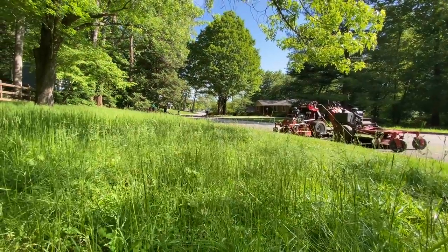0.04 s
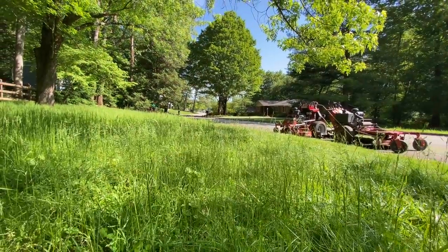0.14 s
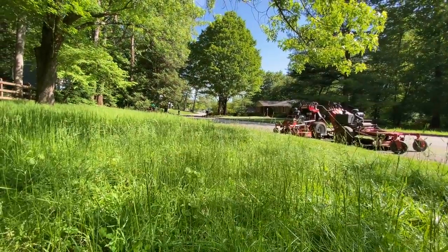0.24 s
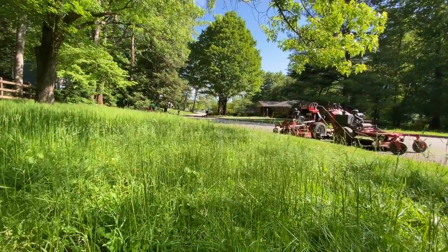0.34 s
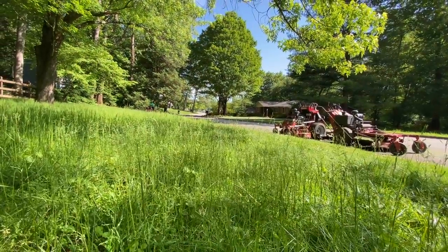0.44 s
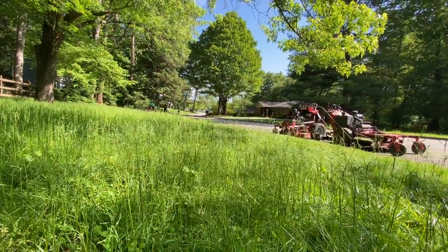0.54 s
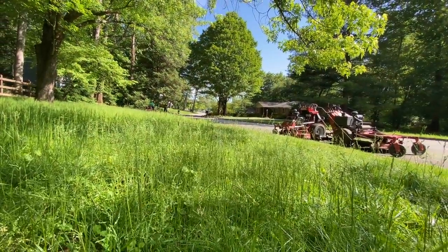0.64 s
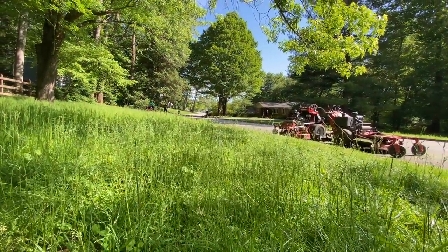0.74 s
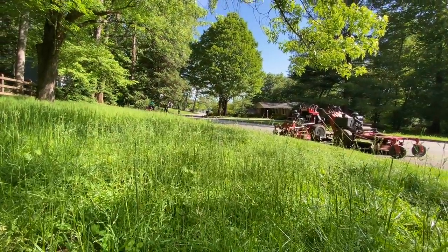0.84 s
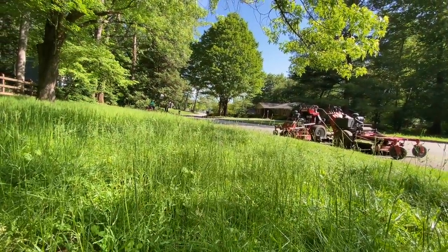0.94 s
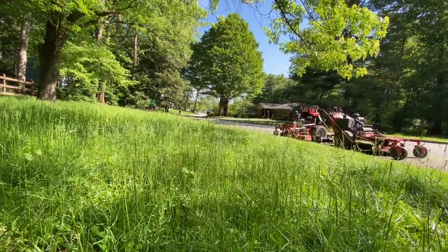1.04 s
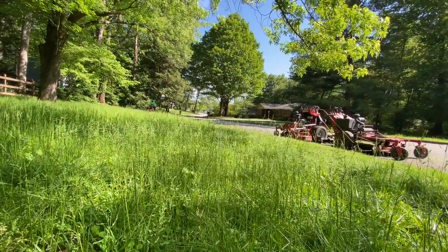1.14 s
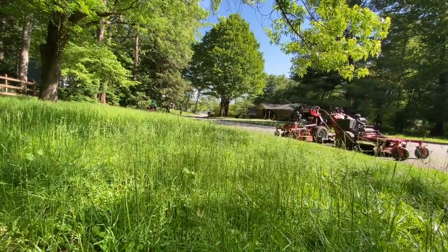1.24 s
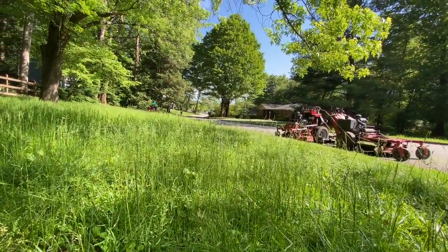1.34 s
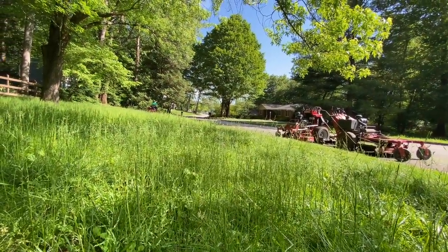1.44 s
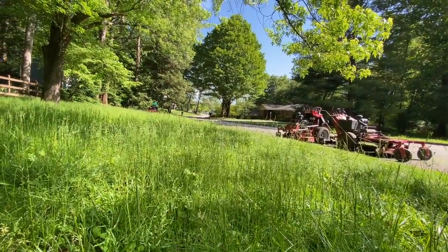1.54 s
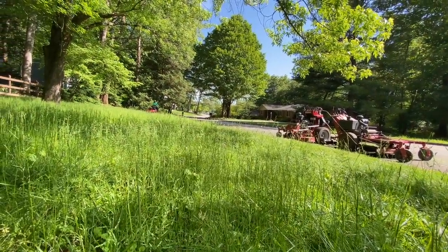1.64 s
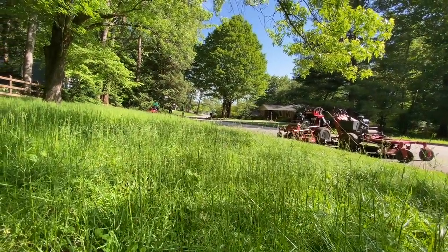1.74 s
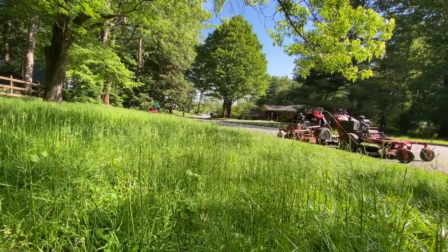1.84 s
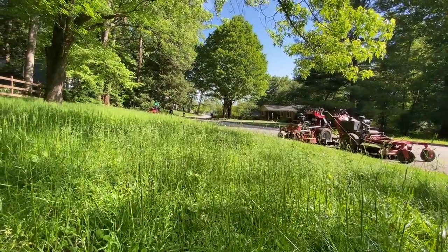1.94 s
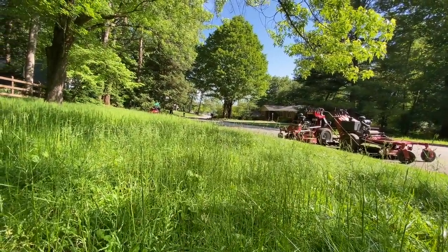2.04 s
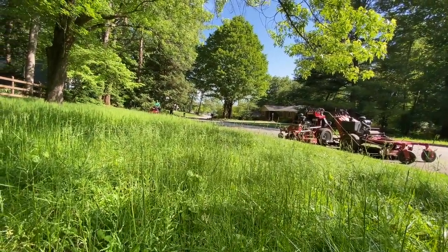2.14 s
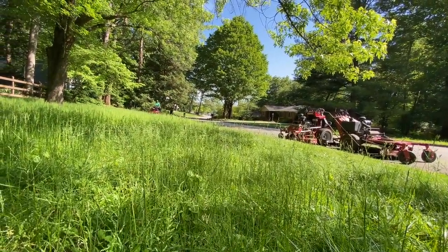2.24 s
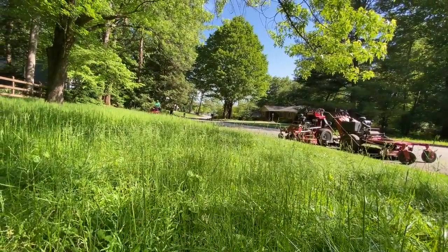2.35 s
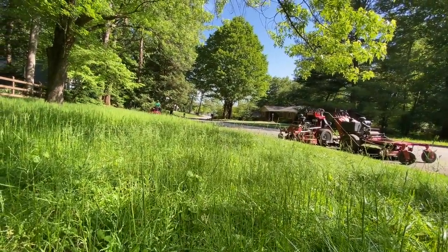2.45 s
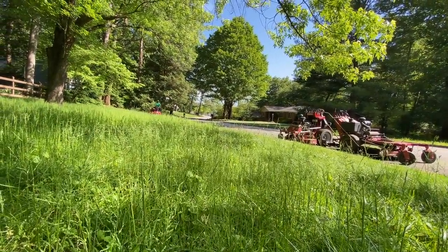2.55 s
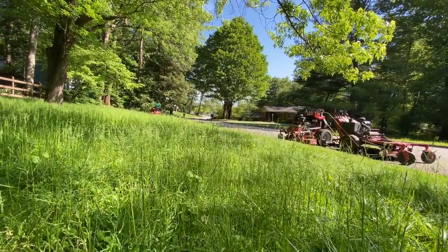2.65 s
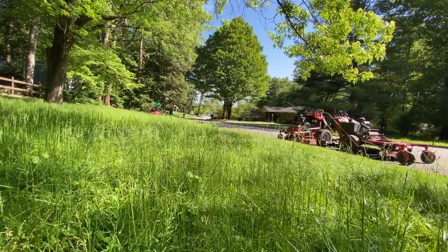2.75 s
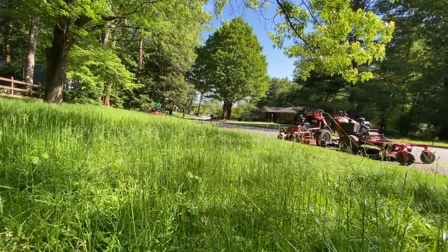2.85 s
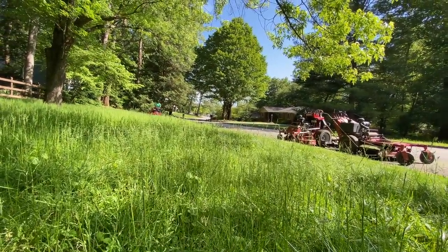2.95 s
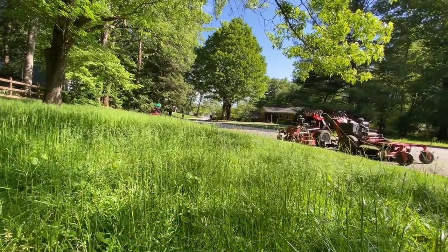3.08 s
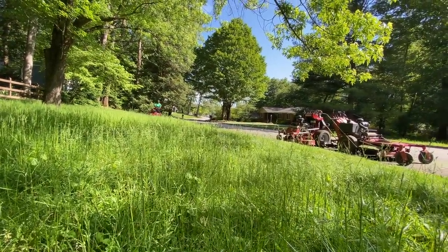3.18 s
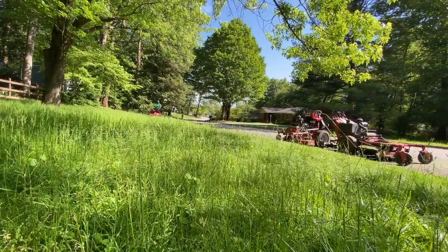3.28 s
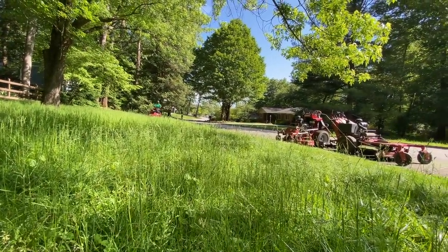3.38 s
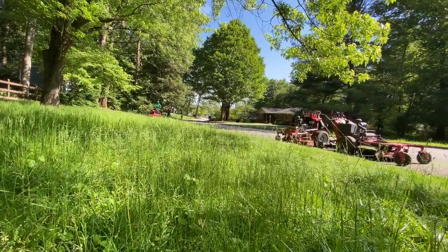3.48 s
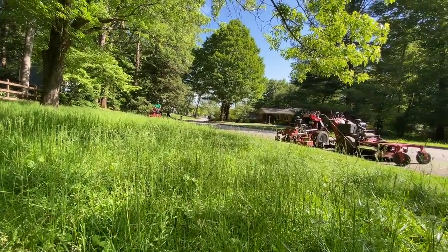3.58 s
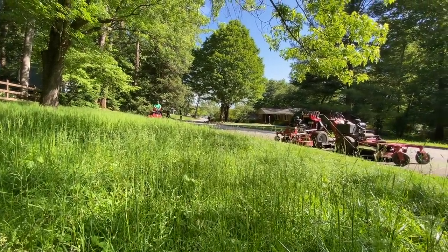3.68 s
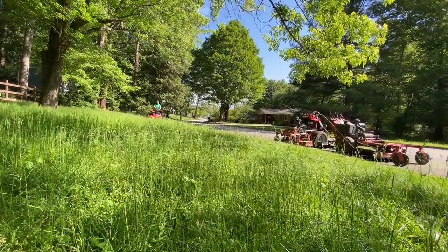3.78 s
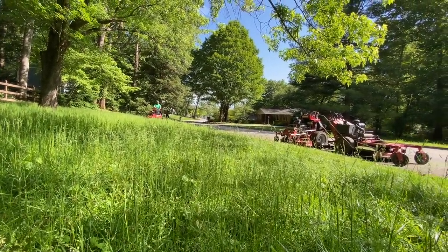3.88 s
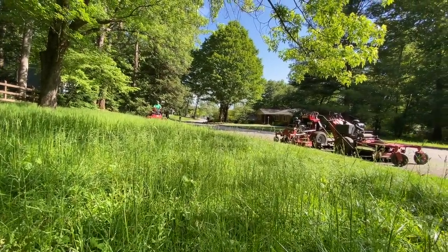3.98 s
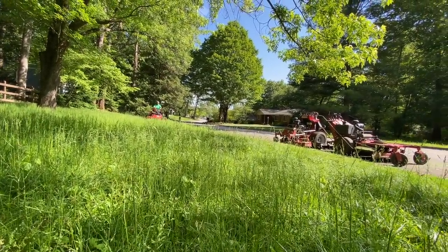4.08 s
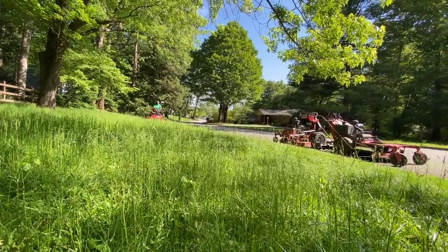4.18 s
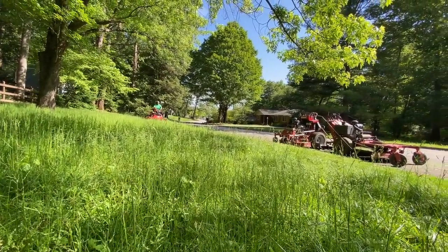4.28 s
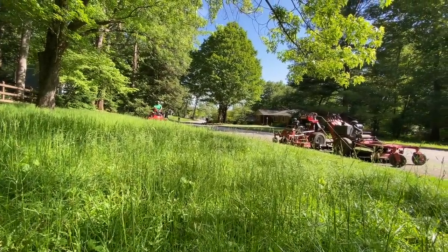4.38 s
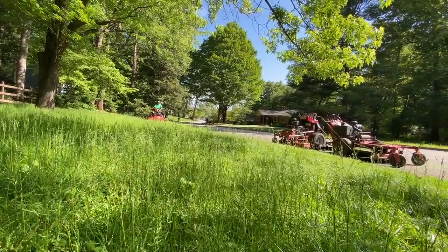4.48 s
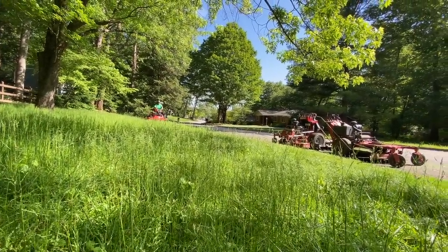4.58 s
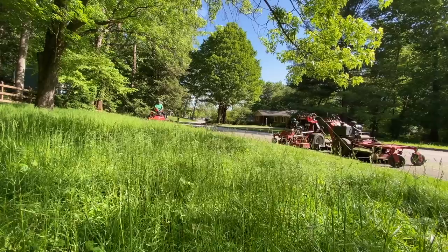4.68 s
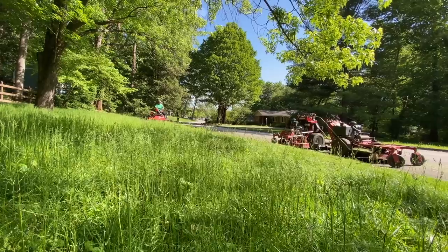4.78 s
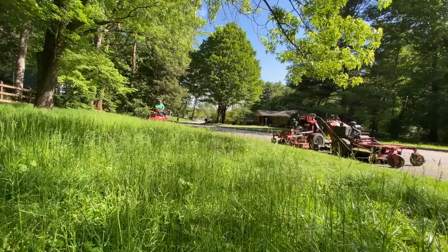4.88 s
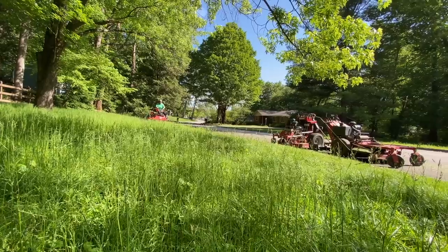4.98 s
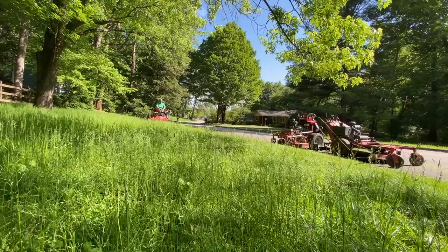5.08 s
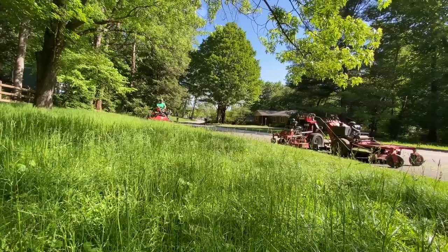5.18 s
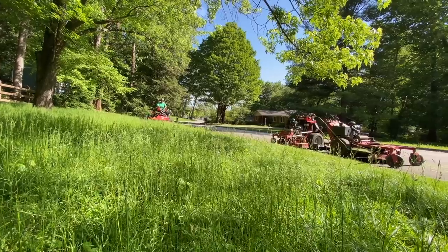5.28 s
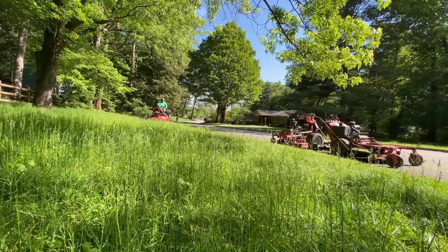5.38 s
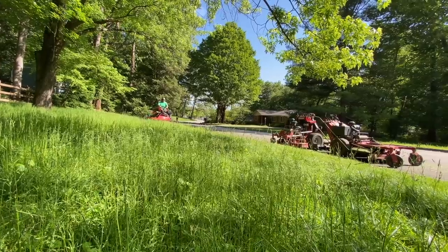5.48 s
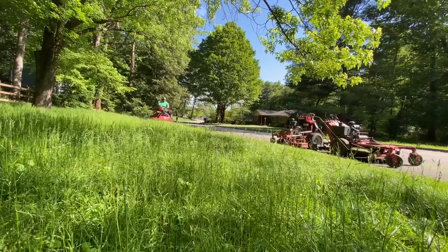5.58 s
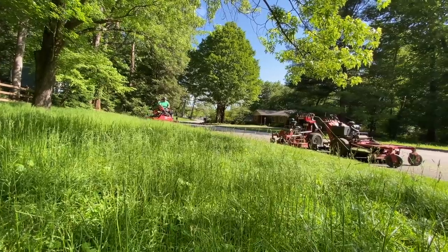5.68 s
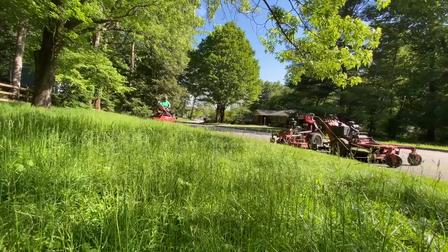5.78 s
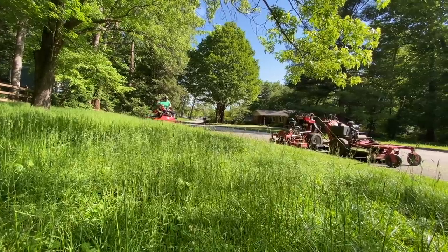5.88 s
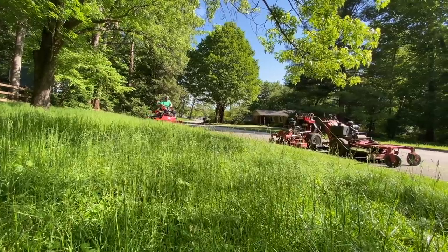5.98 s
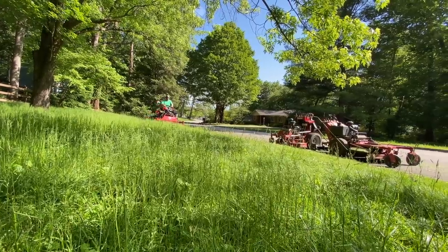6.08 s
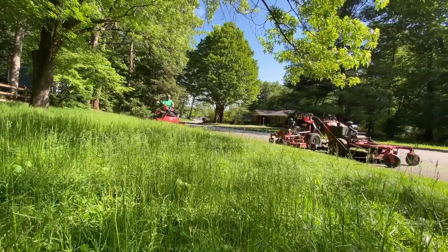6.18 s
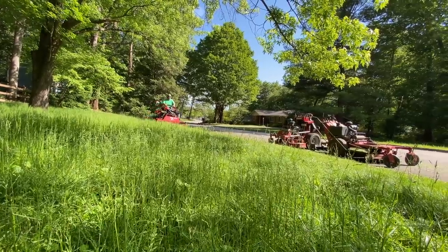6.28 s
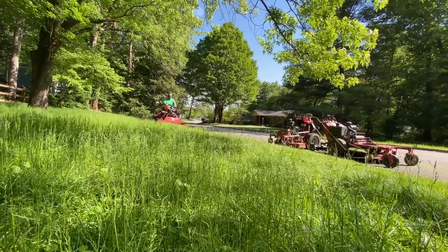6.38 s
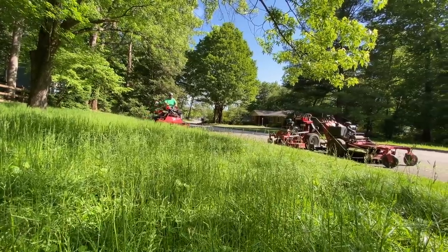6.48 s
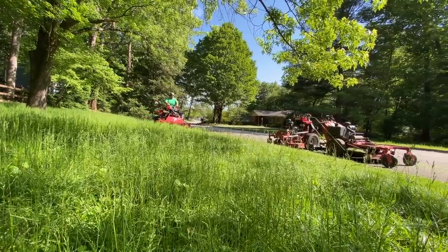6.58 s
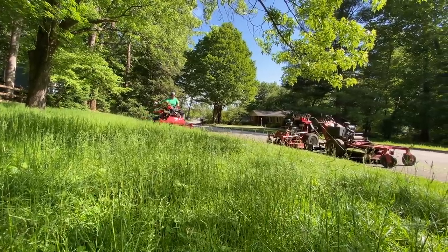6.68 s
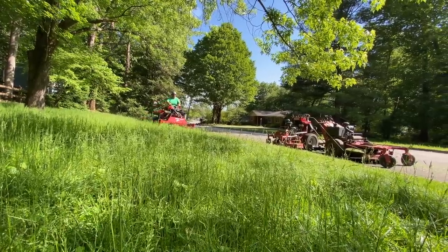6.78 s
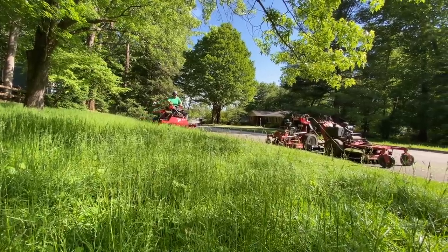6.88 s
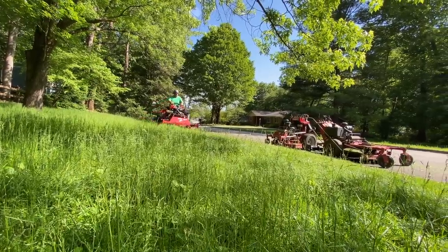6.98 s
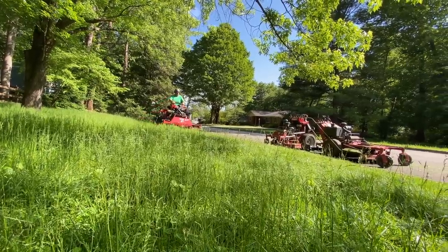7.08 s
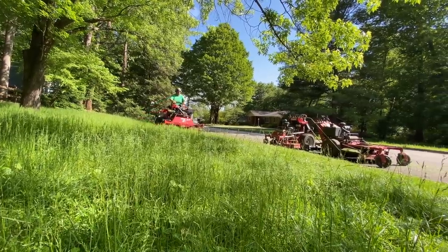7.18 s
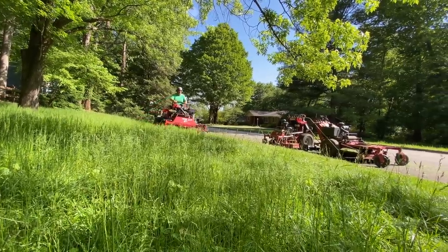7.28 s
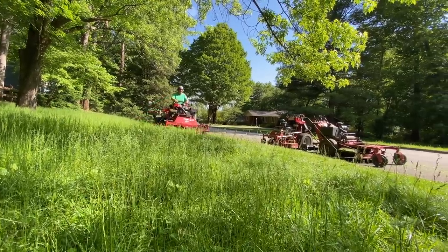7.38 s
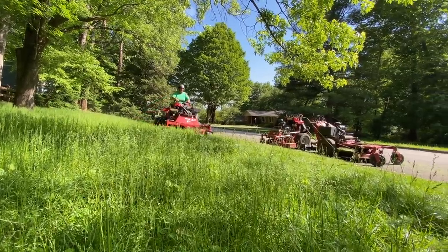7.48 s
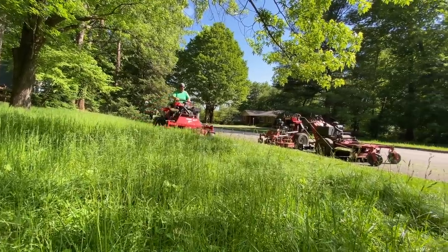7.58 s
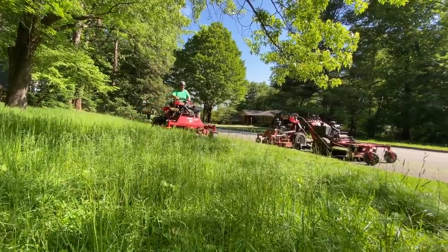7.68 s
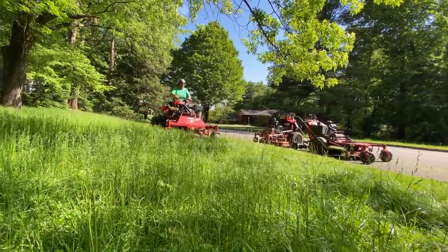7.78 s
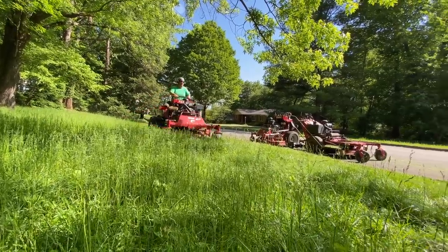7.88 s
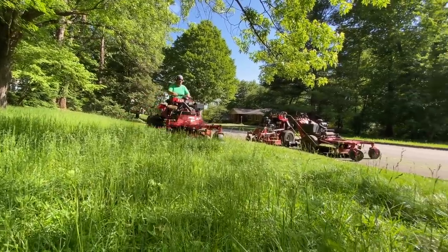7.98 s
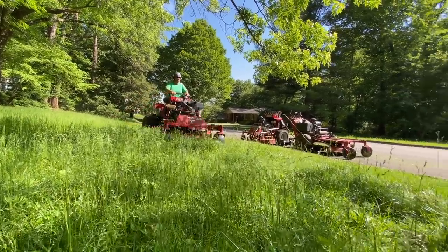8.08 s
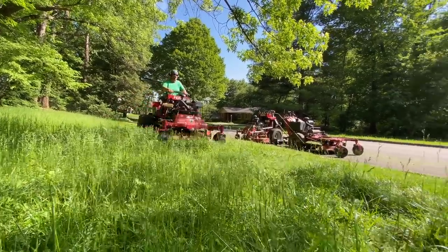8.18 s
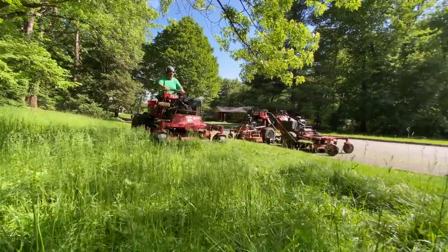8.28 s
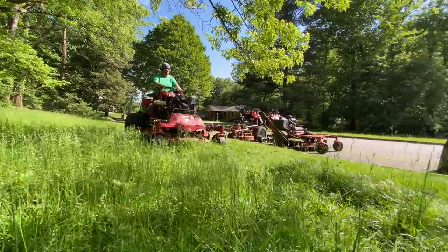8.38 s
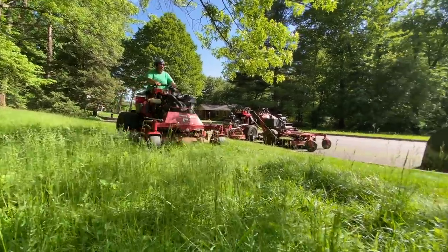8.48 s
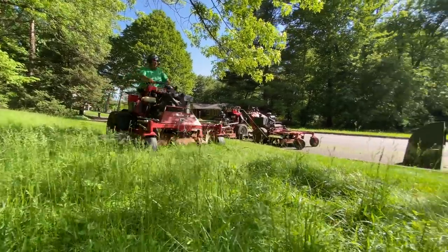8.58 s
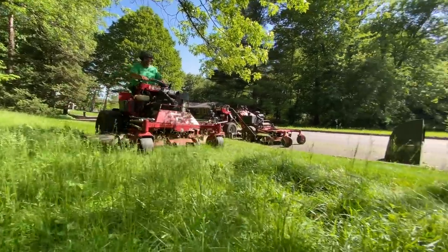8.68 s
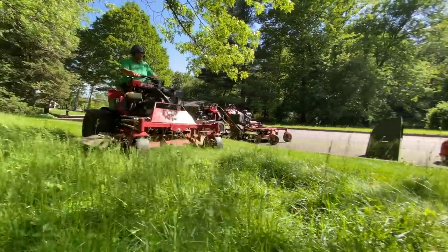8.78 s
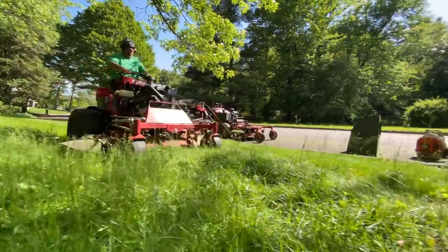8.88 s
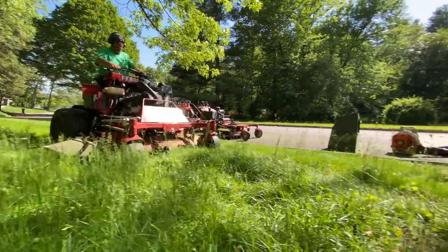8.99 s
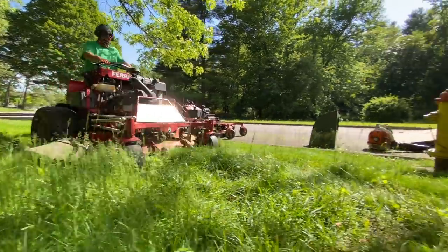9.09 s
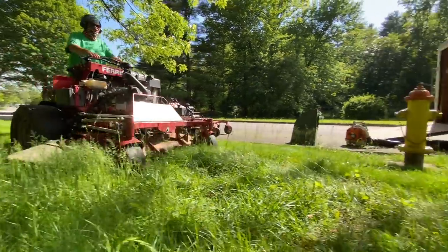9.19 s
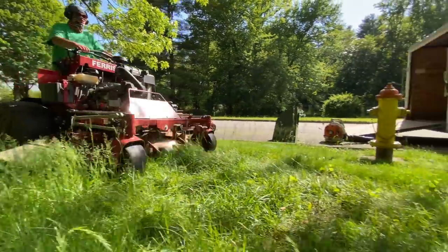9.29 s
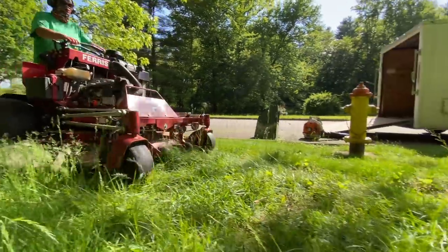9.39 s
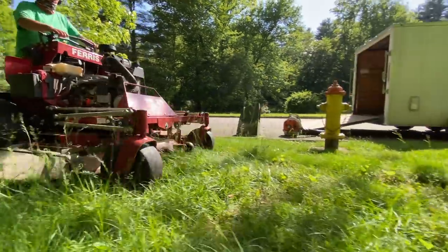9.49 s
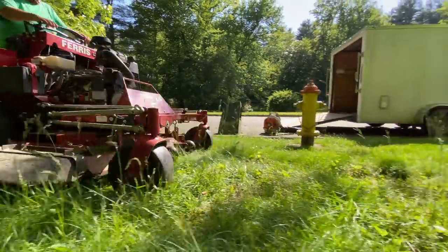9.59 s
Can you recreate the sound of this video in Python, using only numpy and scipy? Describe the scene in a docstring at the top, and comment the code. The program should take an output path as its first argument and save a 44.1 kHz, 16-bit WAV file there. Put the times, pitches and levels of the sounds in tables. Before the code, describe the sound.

A ride-on mower drones steadily across a lawn, growing from a distant hum to a close throbbing roar with swishing grass and snapping stalks.

```python
"""Ride-on mower approaching through grass

A two-cylinder mower drives across a lawn toward a pair of microphones low in the grass, ending on their left.
Wavering sines make the throb of the engine, the hum of the blades, a gear whine and a belt hum.
Shaped noise makes the deck roar, the swish of cut grass and the engine hiss, puffed twice per firing cycle.
Short noise bursts are stalks snapping. Arrival, likeness and balance at the two microphones place it in stereo."""
import sys
import numpy as np
from scipy import signal
from scipy.io import wavfile
from scipy.ndimage import uniform_filter1d, map_coordinates

SR = 44100
rng = np.random.default_rng(int(sys.argv[2]) if len(sys.argv) > 2 else 0)


def inscribe(sig):
    """Save sig as 16-bit PCM at rate SR to the path in sys.argv[1].

    A 1-D sig is mono; a 2-D sig holds one channel per row.
    Samples are clipped to [-1, 1] before scaling.
    """
    pcm = np.round(np.clip(np.atleast_2d(sig).T, -1, 1) * 32767)
    wavfile.write(sys.argv[1], SR, pcm.astype(np.int16))


N = 425124
SIZE, HOP = 2048, 512  # noise frame and step, samples

# the drive across the lawn: time_s, distance_m, bearing (0 ahead left, 1 ahead, 2 beside)
PATH = [(0, 47, 0), (3, 32, 0.09), (5, 21, 0.24), (6.5, 17, 0.49), (7.6, 14, 0.94), (8.4, 8.1, 0.9),
        (8.75, 2.5, 1.33), (9.1, 2.3, 1.71), (9.64, 2.6, 2)]
# engine speed, hunting under the load of the grass: time_s, firing_cycles_hz
SPEED = [(0, 27.45), (.75, 27.31), (1.25, 27.4), (1.75, 27.29), (2.3, 27.42), (2.7, 27.6), (3.3, 27.49),
         (3.8, 27.47), (4.25, 27.54), (4.75, 27.47), (5.3, 27.58), (5.75, 27.56), (6.25, 27.42),
         (6.75, 27.44), (7.25, 27.5), (7.75, 27.63), (8.25, 27.48), (8.7, 27.7), (9.64, 27.73)]
# loudness along the drive: time_s, deck_roar_db, engine_hiss_db
LEVELS = [(0, -40.5, -48), (.8, -39.5, -46), (1.9, -37.5, -44.5), (3, -36.5, -44), (4.1, -35, -42.5),
          (5, -33.5, -41.5), (5.5, -32.5, -40), (6.5, -30.5, -37.5), (7.2, -29.5, -35), (8.2, -27.5, -33.5),
          (8.6, -27.5, -32), (8.88, -26.5, -31.5), (8.96, -29, -34.5), (9.2, -27, -33.5), (9.64, -28, -35)]


def engine():
    """Two uneven firings per cycle make orders whose phases stay nearly locked into a throb."""
    # steadier orders, level changing with bearing: order, far_db, close_db (both over the roar)
    steadier_orders = [(1, -28, -27), (2, -1.5, -2.5), (3, -1.5, -7.5), (4, -14.5, -20.5), (5, -4, -9),
                       (6, -5.5, -16), (8, -6, -16.5)]
    # widely wavering orders, rising with the deck roar: order, level_db (over the roar)
    wavering_orders = [(10, -17), (13, -22.5), (16, -21)]
    return rotation_lines(1, steadier_orders, wavering_orders, slips=.15, phase_rad=throb_rad)


def blades():
    """Belt-driven blade passes make multiples whose phases slide apart freely."""
    # steadier multiples, level changing with bearing: multiple, far_db, close_db (both over the roar)
    steadier_passes = [(1, 6, 1.5), (1.5, -11.5, -21), (2, -7.5, -2), (3, 0, -3), (4, -3.5, -12),
                       (5, -7, -8.5), (6, -15.5, -12.5), (7, -20.5, -18), (8, -25, -20.5),
                       (9, -22.5, -22.5)]
    # widely wavering, from unequal blade ends and upper multiples: multiple, level_db (over the roar)
    wavering_passes = [(4.5, -24), (10, -33)]
    belt_ratio = 3.545  # blade passes per firing cycle
    return rotation_lines(belt_ratio, steadier_passes, wavering_passes, slips=1, phase_rad=lambda k, hz: 0)


def whines():
    """A gear whine and a belt hum follow the engine speed and waver in level."""
    # gear whine, then belt hum: multiple (of the firing cycle), far_db, close_db (both over the roar)
    whine_lines = [(40.2, -24.5, -26), (15.19, -11, -17)]
    cycle_hz = over_time(SPEED, np.arange(N) / SR)[0]
    turns = np.cumsum(cycle_hz) / SR
    out = 0
    for k, far_db, close_db in whine_lines:
        hz = k * cycle_hz.mean()
        out = out + tone(k * turns, hz, line_db(hz, far_db, close_db), waver_db=3.0)
    return out


def deck_roar():
    """Air whirled under the deck, swelling slightly with each puff."""
    # roar colour: pitch_hz, relative_db (per Hz)
    roar_colour = [(30, -21), (45, -66), (68, 5), (120, 2), (180, 5), (250, 5.5), (340, 5), (450, 7.5),
                   (620, 3.5), (720, -0.5), (850, 1.5), (1200, -8.5), (1800, -35.5)]
    level_db = over_time(LEVELS, np.arange(N) / SR)[0]
    return wash(roar_colour, level_db, patchy_db=0.73) * puffed((0.03, .15))


def grass_swish():
    """Cut grass swishes more strongly over the roar as the mower comes beside."""
    # swish colour: pitch_hz, relative_db (per Hz)
    swish_colour = [(500, 0), (900, 1), (1400, 2.5), (1900, -2.5), (2400, -3.5), (3000, -9), (3800, -18),
                    (5000, -52)]
    t = np.arange(N) / SR
    roar_db, bearing = over_time(LEVELS, t)[0], over_time(PATH, t)[1]
    over_roar_db = np.interp(bearing, range(3), [-8.5, -4, -.5])
    return wash(swish_colour, roar_db + over_roar_db, patchy_db=1.1) * puffed((.05, 0.16))


def engine_hiss():
    """Engine hiss, jolted as the machine bounces over the turf; its top is puffed harder."""
    # hiss body: pitch_hz, relative_db (per Hz)
    hiss_colour = [(2500, -1.5), (3400, 3), (3900, 2.5), (4400, 1.5), (5300, 1.5), (6200, 3), (7200, -2.5),
                   (8300, -5.5), (9600, -2)]
    # top of the hiss: pitch_hz, relative_db (per Hz)
    hiss_top = [(11000, -9), (12500, -13), (14800, -11), (15500, -18)]
    top_hz = 6800  # the more strongly puffed band starts here
    level_db = over_time(LEVELS, np.arange(N) / SR)[1]
    jolts = amp(0.27 * drift(10.) + 0.31 * drift(3.7))
    hiss = wash(hiss_colour + hiss_top, level_db, patchy_db=1.1) * unit(jolts)
    low = signal.oaconvolve(hiss, signal.firwin(101, top_hz, fs=SR)[None], "same")
    high = hiss - low
    return low * puffed((.08, 0.27)) + high * puffed((0.19, 0.3))


def snaps():
    """Stalks cut or thrown against the deck: short wide bursts coloured around their pitch."""
    # single snaps: start_s, peak_db, pitch_hz
    snap_events = [(4.780, -32, 2300), (6.561, -28, 2500), (6.816, -27, 2400), (7.435, -26, 1900),
                   (8.687, -23, 3500), (8.828, -23, 4000)]
    out, t = np.zeros((2, N)), np.arange(1200) / SR
    envelope = amp(-60 * t / .025) * (1 - np.exp(-t / .001))  # falls 60 dB in 25 ms
    for start_s, peak_db, pitch_hz in snap_events:
        burst = rng.standard_normal((2, len(t))) * envelope
        burst = burst + burst[0]  # a shared part makes the two sides partly alike
        b, a = signal.butter(2, [pitch_hz * .6, pitch_hz * 2.0], "bandpass", fs=SR)
        burst = signal.lfilter(b, a, burst)
        start = round(start_s * SR)
        out[:, start:start + len(t)] += amp(peak_db) * burst / abs(burst).max()
    return out


def rotation_lines(ratio, steadier, wavering, slips, phase_rad):
    """Multiples of one rotation: steadier lines change with bearing, the others waver widely."""
    t = np.arange(N) / SR
    rotation_hz = ratio * over_time(SPEED, t)[0]
    turns, base_hz = np.cumsum(rotation_hz) / SR, rotation_hz.mean()
    roar_db = over_time(LEVELS, t)[0]
    out = 0
    for k, far_db, close_db in steadier:
        hz = k * base_hz
        waver_db = 1.0 + .25 * np.log(hz / 50)  # wavering grows with pitch
        out = out + tone(k * turns, hz, line_db(hz, far_db, close_db), waver_db, slips, phase_rad(k, hz))
    for k, level_db in wavering:
        hz = k * base_hz
        out = out + tone(k * turns, hz, roar_db + level_db, 5.1, slips, phase_rad(k, hz))
    return out


def throb_rad(order, hz):
    """Phase of an engine order: two uneven firings heard through a low muffler resonance."""
    firing_gap = .375  # the second cylinder fires this far into the cycle
    muffler_hz, muffler_q, throb_lead_rad = 69, 4, .85
    pair = 1 + .9 * np.exp(-2j * np.pi * order * firing_gap)
    u = hz / muffler_hz
    muffler = 1 / (1 - u ** 2 + 1j * u / muffler_q)
    return throb_lead_rad + np.angle(pair * muffler)


def tone(turns, hz, db, waver_db, slips=1, lead_rad=0):
    """One line with wandering level and phase, offset in phase and level between the two microphones."""
    t, half = np.arange(N) / SR, np.array([[.5], [-.5]])  # half the offset to each side
    lead, _, tilt_db = (np.interp(t, t[::HOP], c) for c in ports(hz, t[::HOP]))
    slip_rad = hz / 2600 * drift(7.) + hz / 250 * drift(.8)  # the phase slips more on higher lines
    angle = 2 * np.pi * turns + lead_rad + slips * slip_rad + half * lead
    waver = 0.72 * drift(4.) + 0.72 * drift(11.)
    return np.sqrt(2) * amp(db + waver_db * waver + half * tilt_db) * np.cos(angle)


def line_db(hz, far_db, close_db):
    """Level of a line: it rides on the roar, changes with the bearing, and swells."""
    t = np.arange(0, N + HOP, HOP) / SR
    near = np.clip(over_time(PATH, t)[1], 0, 1)
    db = over_time(LEVELS, t)[0] + far_db + near * (close_db - far_db) + swell_db(hz, t)
    return np.interp(np.arange(N) / SR, t, db)


def swell_db(hz, t):
    """Lines and resonances swell and fade as their echoes across the lawn add or cancel."""
    # swells and fades: middle_s, length_s, line_hz, change_db
    swell_events = [(0.87, 0.47, 97.5, 2), (2.13, 0.88, 97.5, -6.5), (3.44, 0.56, 97.5, -4),
                    (5.7, 0.28, 97.5, -2.5), (9.4, 0.72, 97.5, -2.5), (1.78, 0.3, 195, -9),
                    (4.6, .25, 195, -9), (4.11, 0.75, 195, 3), (0.92, 1.4, 195, 3.5), (2.62, 0.43, 195, 7),
                    (5.53, 1.96, 195, -5), (8.9, 1.86, 195, 4.5), (0.72, 1.14, 292, 2.5),
                    (2.6, 1.8, 292, 2), (3.17, 0.34, 292, -8), (4.09, 0.93, 292, -5.5), (3.7, .2, 292, -5),
                    (5.1, 1.1, 292, -2.5), (9.3, 0.66, 292, -2.5), (6.6, .3, 292, -5.5),
                    (8.55, 0.56, 292, 3), (7.95, .7, 292, 1.5), (6.25, .4, 292, 1.5),
                    (1.85, 0.85, 390, -9.5), (3.55, .8, 390, -3), (5.07, 0.8, 390, -4.5),
                    (6.25, 1.5, 390, 7.5), (5.15, .5, 390, -3), (8.6, 1.6, 390, 2), (0.63, 0.81, 488, -9),
                    (1.9, 0.58, 488, -7), (2.7, .5, 488, 5), (3.58, .3, 488, -6), (3.3, .5, 488, 1),
                    (4.26, 0.8, 488, 2.5), (5.62, 0.5, 488, 3.5), (6.54, 0.45, 488, -9),
                    (1.3, 0.38, 488, 3.5), (7.12, 0.6, 488, 4.5), (8.15, .8, 488, 2), (9.15, 0.5, 488, 2.5),
                    (8.7, .3, 488, -5), (9.5, 0.34, 488, 2), (0.77, 1.6, 640, -4), (2.3, 1.3, 640, 5),
                    (4.4, 0.69, 640, 4.5), (5.6, 1.3, 510, -7), (6.6, .6, 585, 2), (7.75, 0.6, 585, 5.5),
                    (9, 1.5, 585, 3.5), (2.16, .5, 55, -4), (2.9, 0.44, 82.5, -11), (9.3, 0.96, 82.5, -5.5),
                    (1.12, 0.29, 165, -4), (9.6, 1.0, 55, -2.5), (3.45, 0.69, 419, 5.5), (.7, 1.3, 220, 2),
                    (0.72, 0.94, 390, 1), (8.5, 0.5, 370, 4), (2.78, 0.39, 1100, 8), (3.5, .7, 1100, 5.5),
                    (4.5, 0.9, 1100, 4), (5.6, .8, 1100, 1), (9.2, .7, 820, 6), (8.87, .7, 878, 4),
                    (5.54, .5, 878, 5), (6.7, 1.5, 878, -4), (2.8, 1.1, 878, -5), (9.3, .3, 780, 8.5),
                    (7.3, .8, 780, 3), (4.2, 1, 630, -5), (5.4, 1, 683, 6), (7, 2.3, 1700, -12),
                    (0.88, .6, 4900, 6), (6, 1, 4212, 5), (4.6, 2, 3800, 5.5), (8.8, .2, 4212, 6),
                    (11, 0.3, 5000, 7), (.3, .8, 4680, -2), (2.2, .8, 4680, 0), (3.3, 0.61, 4680, 3),
                    (4.5, 2.1, 5200, 7), (5.8, .9, 5200, 2), (.7, 1.1, 4870, -3), (2.1, .8, 4870, 4),
                    (3.2, .6, 4870, -1), (5, 0.99, 4870, -1), (8.82, .16, 4100, 5), (7.7, .7, 4212, -5),
                    (8.4, .5, 3370, 4), (9.3, 0.44, 3370, 1), (7.9, 0.4, 1905, 7), (8.4, .3, 1905, 2),
                    (6.7, .6, 3700, 5), (7, 0.68, 1600, 5), (6.7, 1.1, 2130, 7), (9.35, 0.49, 1470, 10),
                    (4.95, 0.59, 2460, 0), (2, .5, 5620, -5), (6.3, .9, 5620, 1.5), (8.55, .3, 5620, 6)]
    middle_s, length_s, line_hz, change_db = np.transpose(swell_events)[..., None]
    on_line = abs(np.log(line_hz / hz)) < .015
    shape = np.exp(-(2 * (t - middle_s) / length_s) ** 4)
    return (on_line * change_db * shape).sum(0)


def puffed(strengths):
    """Gain that jumps briefly at two unevenly spaced puffs in each engine cycle."""
    # one row per puff: place_cycles, width_cycles
    puff_places = [(.9, .09), (.2, .09)]
    cycle = np.cumsum(over_time(SPEED, np.arange(N) / SR)[0]) / SR
    gain = 1
    for strength, (place, width) in zip(strengths, puff_places):
        offset = (cycle - place + .5) % 1 - .5
        gain = gain + strength * np.exp(-(offset / width) ** 2)
    return unit(gain)


def wash(spectrum, level_db, patchy_db):
    """Patchy coloured noise, dulled by air and a ground echo, partly alike at the two microphones."""
    frames, hz = N // HOP + 5, np.fft.rfftfreq(SIZE, 1 / SR)
    t = np.arange(frames) * HOP / SR
    a, b, c, d, patches, strands = rng.standard_normal((frames, len(hz), 6)).T
    # strands are narrow bands that swell for a second or so; patches are wider and shorter
    strands = unit(uniform_filter1d(uniform_filter1d(strands, size=3, axis=0), size=70, axis=1))
    patches = unit(uniform_filter1d(uniform_filter1d(patches, size=16, axis=0), size=8, axis=1))
    colour = amp(noise_colour_db(spectrum, hz[:, None], t))
    colour = colour / np.sqrt((colour ** 2).mean(0))  # colour alone leaves each frame's level even
    lead, alike, tilt_db = ports(hz, t)
    alike = np.clip(alike, 0, 1)
    left = a + 1j * b
    right = alike * np.exp(-1j * lead) * left + np.sqrt(1 - alike ** 2) * (c + 1j * d)
    pair = np.array([left * amp(tilt_db / 2), right / amp(tilt_db / 2)])
    z = pair * colour * amp(patchy_db * patches + 1.3 * strands)
    noise = signal.istft(z, nperseg=SIZE, noverlap=SIZE - HOP)[1][:, :N]
    return amp(level_db) * unit(noise)


def noise_colour_db(spectrum, f, t):
    """Source spectrum plus resonances and a whistle, less air loss and the ground-echo dip."""
    # cowl resonances and narrow gaps: pitch_hz, width_hz, far_db, close_db
    cowl_rings = [(660, 60, 2, 1), (1405, 50, -1, -7), (1470, 50, 0, 3), (1600, 50, 1, 3), (1905, 40, 3, 6),
                  (2130, 40, 1, 2.5), (2265, 70, -3, -4), (2460, 150, 2, 1), (3370, 120, 0, 2),
                  (3880, 150, -2, -2), (4100, 100, 0, 0), (4680, 170, 3, 1.5), (4780, 80, 1, 1),
                  (4870, 120, 2, 0), (5620, 120, 1.5, 1)]
    whistle_hz, whistle_width_hz, whistle_db = 4203, 32, 6  # a thin whistle in the noise
    metres, bearing = over_time(PATH, t)
    near = np.clip(bearing, 0, 1)
    colour_db = over_hz(spectrum, f) - 60 * (f < .7 * spectrum[0][0])  # cut below the source's range
    for ring_hz, width_hz, far_db, close_db in cowl_rings:
        ring_db = far_db + near * (close_db - far_db) + swell_db(ring_hz, t)
        colour_db = colour_db + ring_db / (1 + (2 * (f - ring_hz) / width_hz) ** 2)
    whistle_now_db = whistle_db + swell_db(whistle_hz, t)
    colour_db = colour_db + whistle_now_db / (1 + (2 * (f - whistle_hz) / whistle_width_hz) ** 2)
    colour_db = colour_db - .12 * metres * (f / 10000) ** 1.3  # air takes the treble
    # the ground echo cancels a band; this dip fills and rises in pitch close by
    dip_db, dip_hz = 7.5 * np.tanh(metres / 18), 790 + 4000 / metres
    return colour_db - dip_db * np.exp(-(np.log((f + 1) / dip_hz) / 0.28) ** 2)


def ports(hz, t):
    """Phase lead of the left microphone, likeness and balance, blended between three bearings."""
    # microphone pair: pitch_hz, then at bearings 0, 1, 2 each:
    # 3 x left_lead_rad, 3 x likeness (0-1), 3 x left_minus_right_db
    port_rows = [(100, 0.24, 0.034, 0.079, 0.77, 0.99, 0.86, 1.0, 0.5, -1),
                 (347, 0.89, 0.36, 0.99, 0.97, 0.88, 0.93, 1.5, 1.2, 5),
                 (690, 1.25, 0.85, 1.9, 0.59, 1, 0.63, 5, 3.5, 3.5),
                 (1000, 1.75, 0.58, 2.1, 0.12, 0.86, 0.91, 7.5, 3, 7),
                 (1480, 2.8, 1.55, 2.87, 0.58, 0.92, 0.88, 4, 1.5, 3.5),
                 (2070, 2.15, 0.52, 3.5, 0.43, 0.49, 0.67, 0, -1.5, 1),
                 (2620, 2.7, 1.93, 4.6, 0.17, 1, 0.38, 0.5, -1, 1),
                 (3530, 3.8, 3.1, 5.3, 0.57, 0.75, 0.95, 3, 0.5, 3.5),
                 (4450, 6.4, 3.7, 7.6, 0.46, 0.33, 0.62, -1, -4, -1),
                 (5030, 6.6, 3.3, 11.7, 0.25, 0.45, 0.22, 2.5, 1, 10),
                 (6100, 7.2, 7.4, 13.5, 0.37, 0.51, 0.49, 1.5, -2, 3),
                 (7060, 5.7, 10, 17, 0.44, 0.097, 0.14, 1.5, 1.4, -1),
                 (9600, 5.1, 12, 19.7, 0.31, 0.1, 0.29, -0.5, -0.5, 0.0),
                 (12200, 8.7, 11, 21, 0.18, 0.16, 0.26, -0.5, 0.0, 0.0)]
    bearing = over_time(PATH, t)[1]
    shares = [np.clip(1 - abs(bearing - pose), 0, 1) for pose in range(3)]
    f, *columns = np.transpose(port_rows)
    read = [np.interp(hz, f, c)[..., None] for c in columns]
    return [sum(r * s for r, s in zip(read[k:k + 3], shares)) for k in range(0, 9, 3)]


def drift(rate_hz):
    """Slow random wander of rms 1, a smooth curve through random knots."""
    knots, t = rng.standard_normal(400), np.arange(0, N + 64, 64) / SR
    curve = map_coordinates(knots, [t * np.clip(rate_hz, .1, 40)], order=3)
    return unit(np.interp(np.arange(N) / SR, t, curve))


def over_time(rows, t):
    """Reads every column of a curve table at times t."""
    s, *columns = np.transpose(rows)
    return [np.interp(t, s, c) for c in columns]


def over_hz(points, hz):
    """Reads a spectrum on a log-frequency axis."""
    f, value = np.transpose(points)
    return np.interp(np.log(hz + 1), np.log(f + 1), value)


def amp(db):
    """Decibels to a linear gain."""
    return 10 ** (np.asarray(db) / 20)


def unit(x):
    """Scales a signal to rms 1."""
    return x / np.sqrt(np.mean(x ** 2) + 1e-20)


def scene():
    """The machine's tones, its noises and the snapping stalks together."""
    tones = engine() + blades() + whines()
    noises = deck_roar() + grass_swish() + engine_hiss()
    return tones + noises + snaps()


def record(dry):
    """The recorder's band limit: a steep low-pass at 15.6 kHz."""
    edge = signal.firwin(767, 15600, window=("kaiser", 10), fs=SR)
    return signal.oaconvolve(dry, edge[None], "same")


dry = scene()
out = record(dry)
inscribe(out)
```